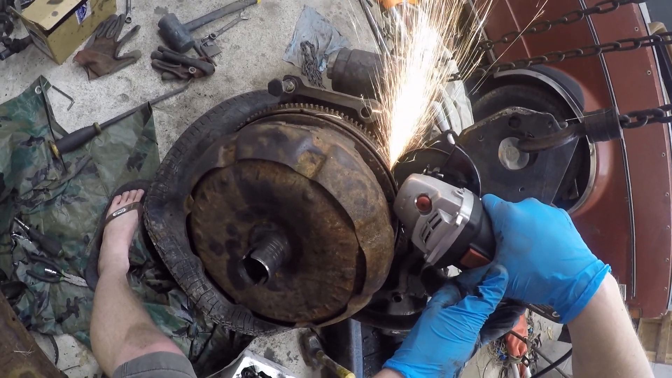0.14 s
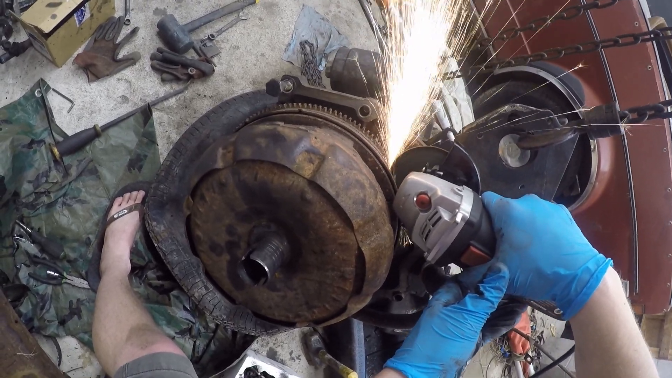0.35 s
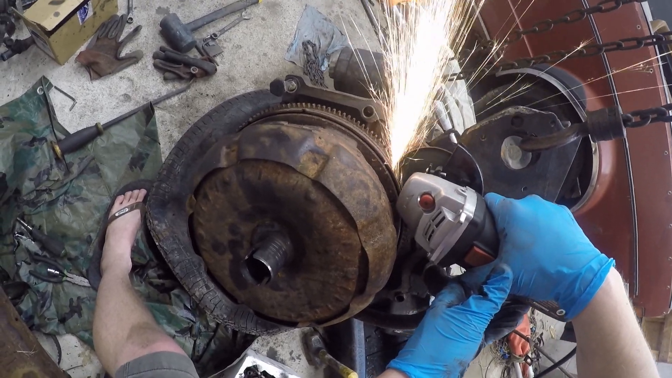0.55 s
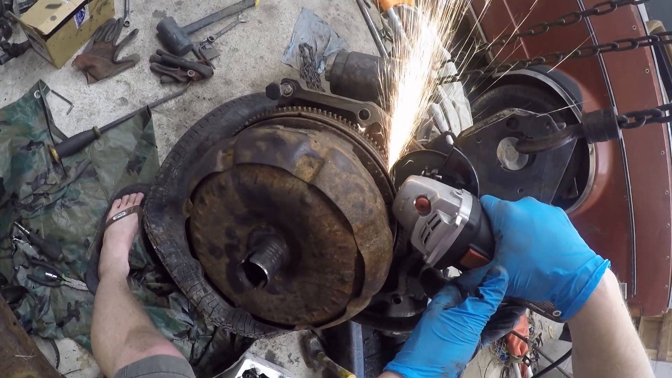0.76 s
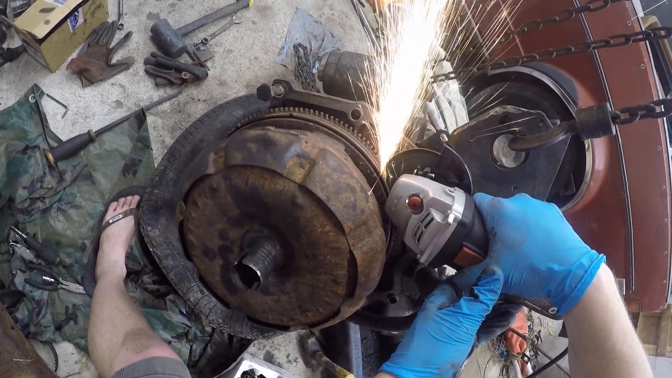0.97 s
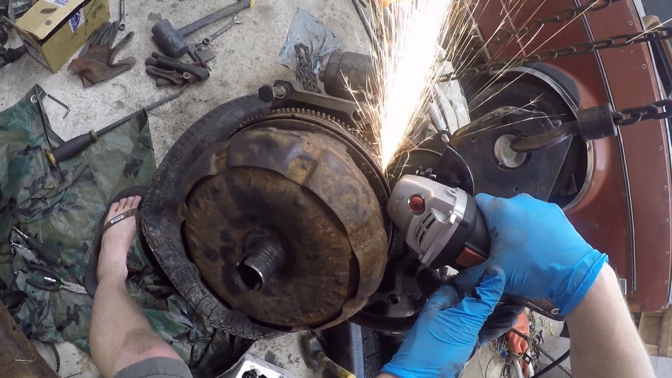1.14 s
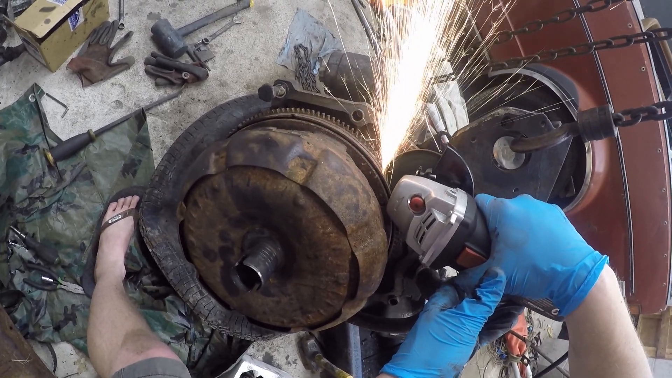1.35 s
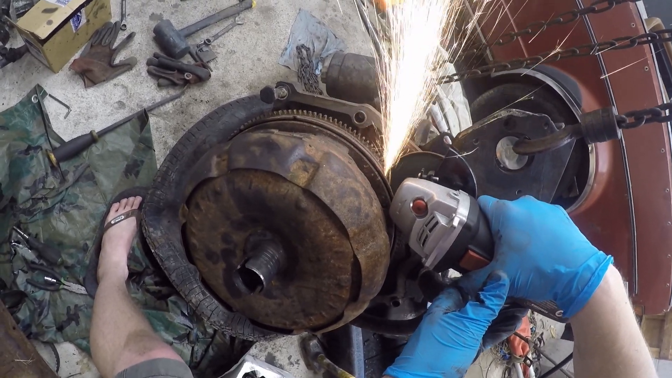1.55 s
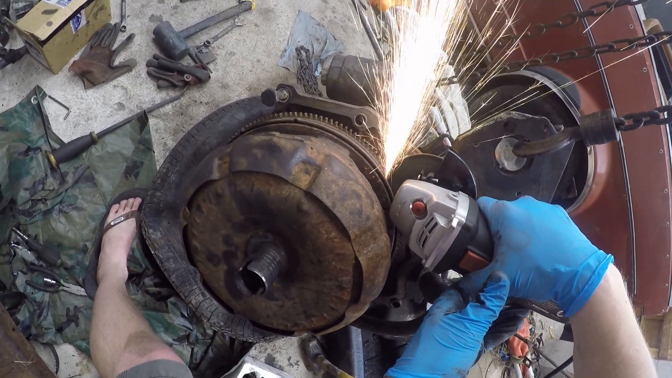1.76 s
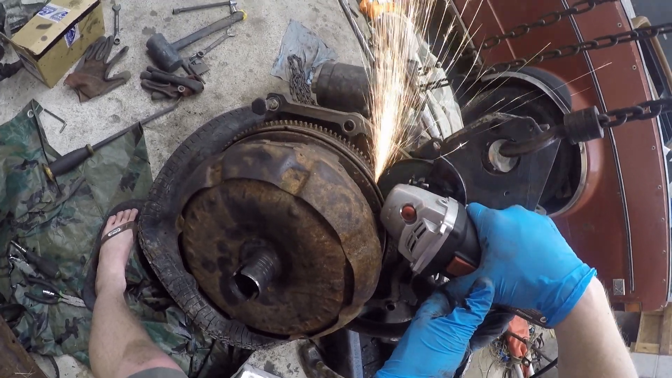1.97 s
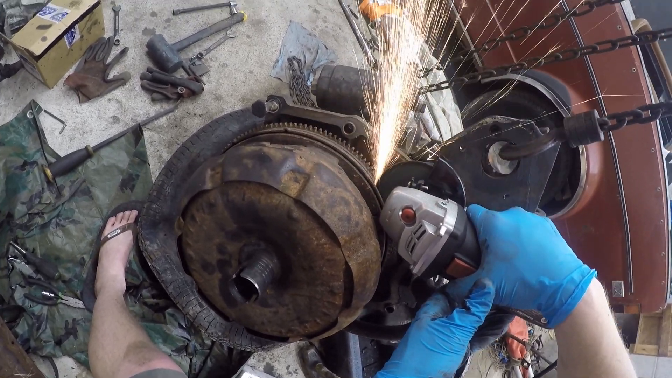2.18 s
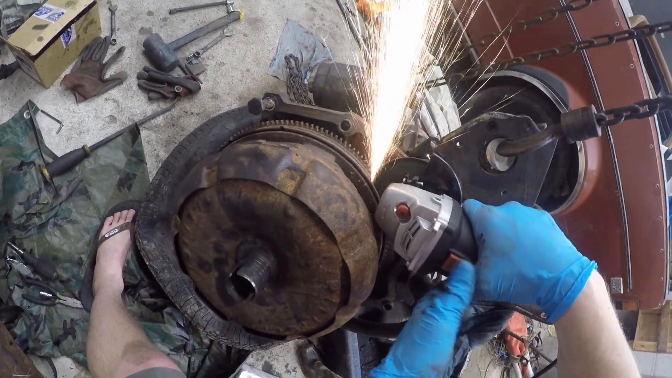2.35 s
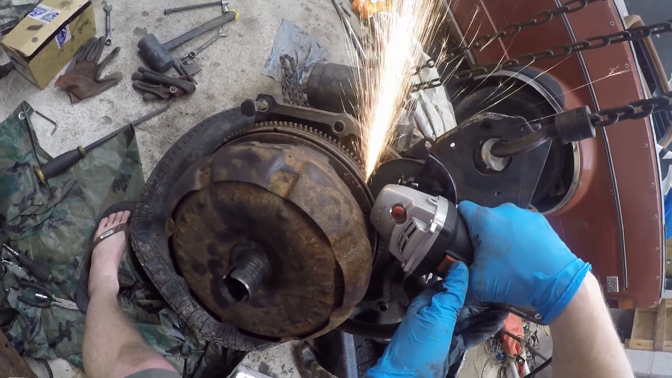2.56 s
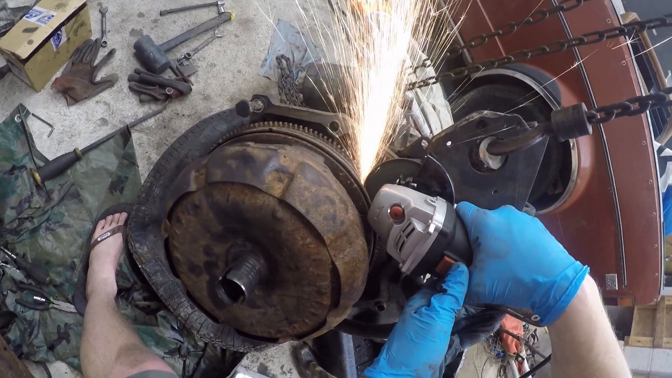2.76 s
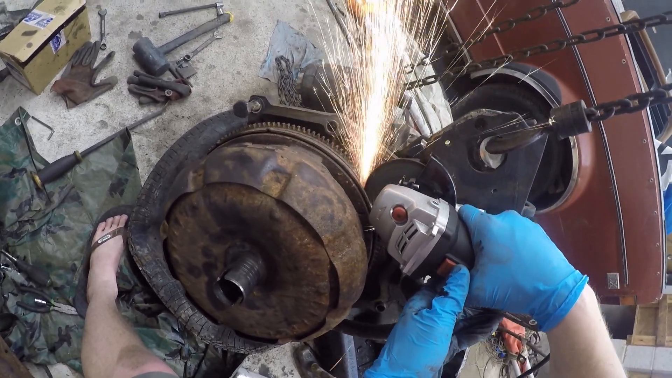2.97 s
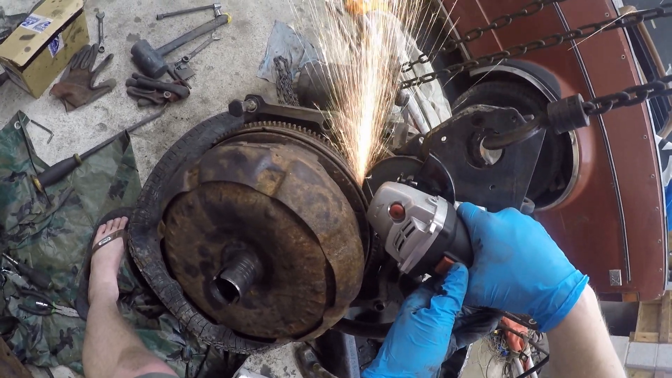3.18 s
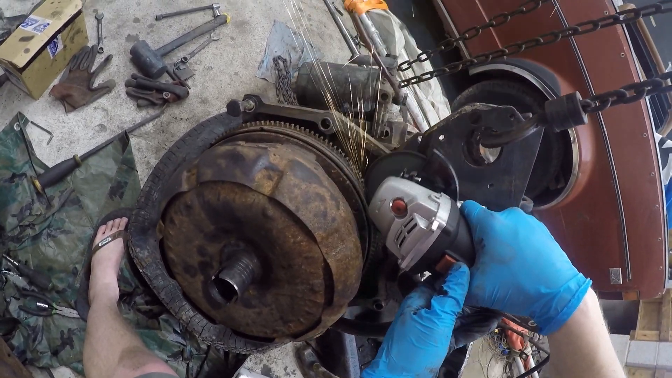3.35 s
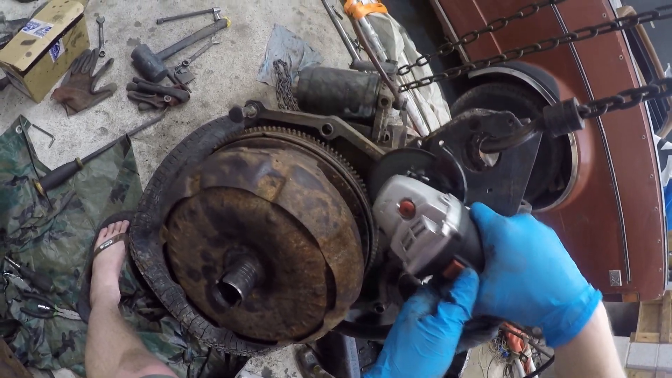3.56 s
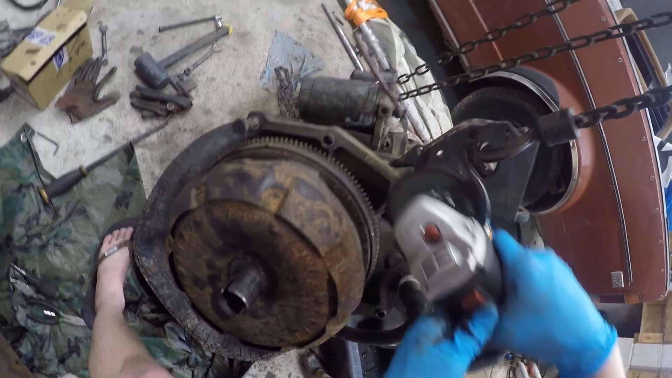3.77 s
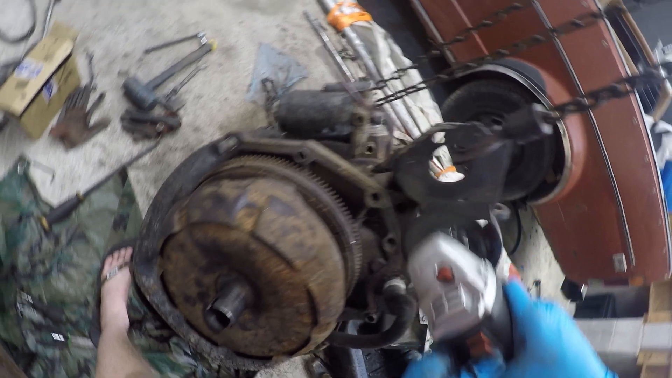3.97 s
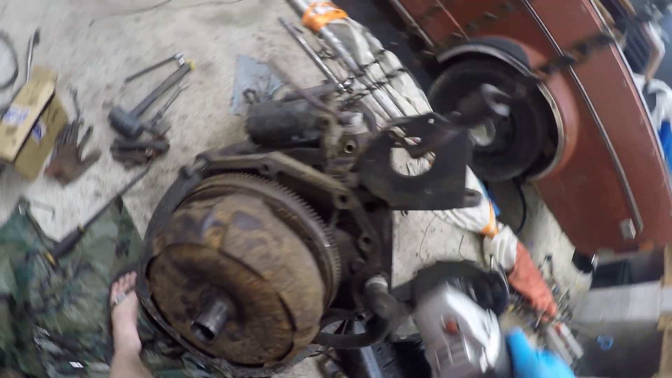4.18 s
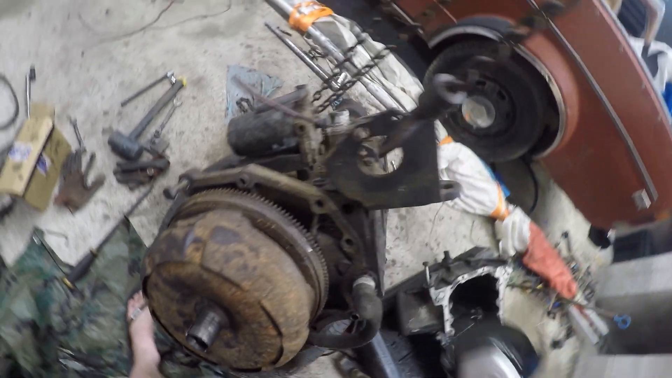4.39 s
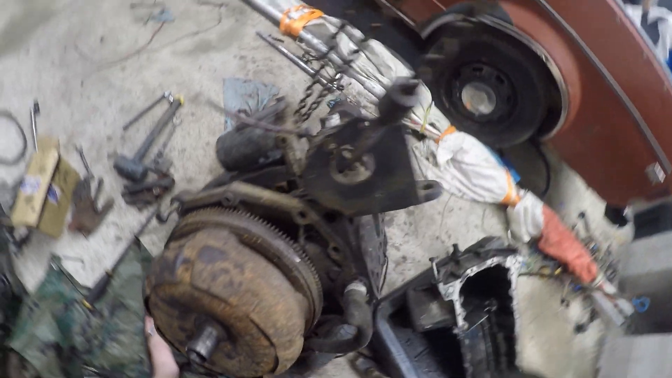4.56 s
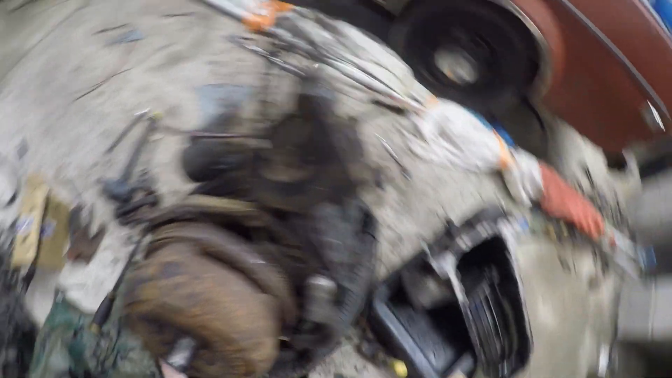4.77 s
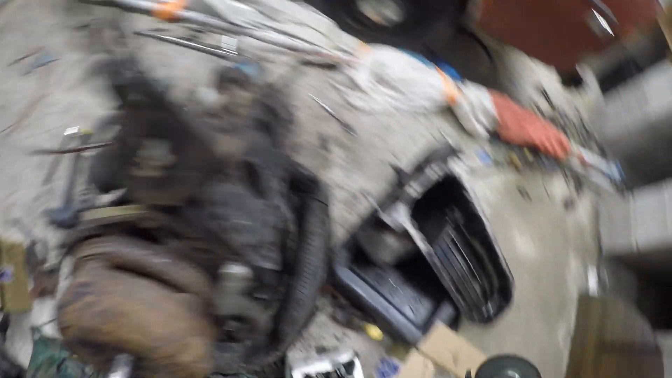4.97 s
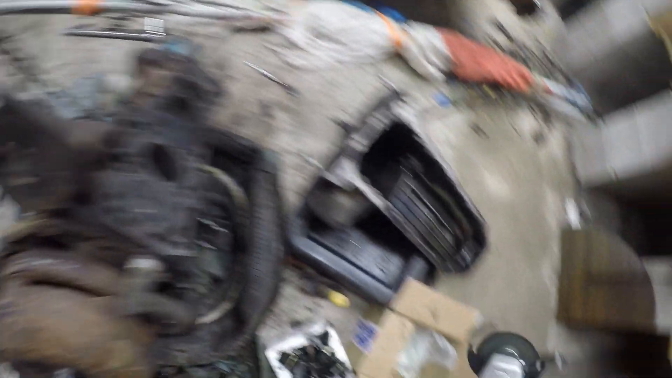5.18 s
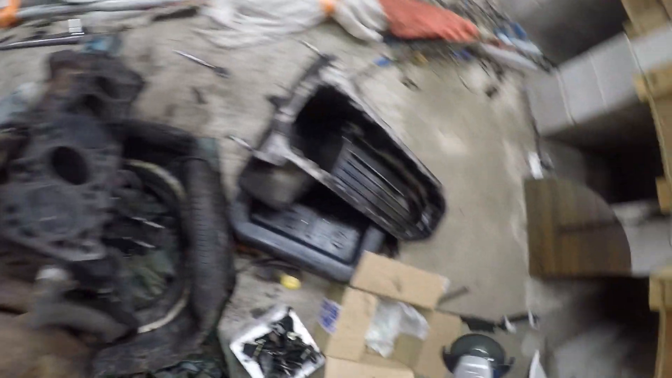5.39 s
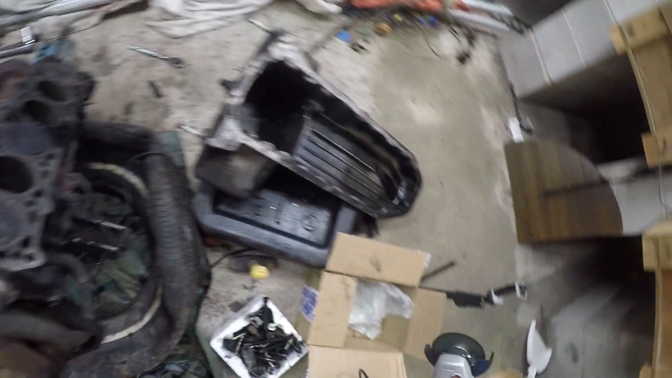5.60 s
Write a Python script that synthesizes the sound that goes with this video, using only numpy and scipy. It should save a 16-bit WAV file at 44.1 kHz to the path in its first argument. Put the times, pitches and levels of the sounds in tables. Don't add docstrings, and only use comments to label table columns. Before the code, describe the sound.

Close, gritty grinding of steel with chattering metallic tones, then the freed grinder motor rattles and coasts gradually lower and quieter.

```python
import sys
import numpy as np
from scipy import signal
from scipy.fft import rfft, irfft, next_fast_len
from scipy.io import wavfile
from scipy.ndimage import uniform_filter1d, map_coordinates

SR = 44100
rng = np.random.default_rng(int(sys.argv[2]) if len(sys.argv) > 2 else 0)


def makeup_ratio(level_db):
    decades = np.asarray(level_db, float) / 20
    return 10 ** decades


def inscribe(sig):
    pcm = np.round(np.clip(np.atleast_2d(sig).T, -1, 1) * 32767)
    wavfile.write(sys.argv[1], SR, pcm.astype(np.int16))


N = 248283
T = np.arange(N) / SR
F = np.maximum(np.fft.rfftfreq(next_fast_len(N + 8192), 1 / SR), 1)

# time in seconds, speed in turns per second.
LOADED_SPEED = [(0, 128), (1.98, 128.7), (2.14, 132.5), (2.31, 136.6), (2.39, 134.2), (2.54, 132.5),
                (2.7, 130.2), (2.86, 129), (2.94, 129.7), (3.1, 134.2), (3.3, 138.7)]
NO_LOAD_TURNS_S, RUN_UP_S, SWITCH_OFF_S, COAST_S = 166, .33, 4.02, 2.207
GEAR_RATIO, FAN_BLADES = 37 / 12, 37

# time in seconds, scrape level in dB.
BITE = [(0, -33), (.26, -35), (.6, -35), (.78, -37), (1.04, -33.5), (1.17, -35), (1.3, -32), (1.45, -34),
        (1.65, -34), (1.82, -33), (1.95, -34.5)]
# frequency in Hz, width in Hz, level in dB.
STEEL_SHALLOW = [(313, 73, -33.5), (601, 71, -25), (900, 66, -8.5), (1162, 43, -7.5), (2050, 480, -8),
                 (2462, 47, -1.5), (2920, 330, -0.5), (3150, 82, -0.5), (3450, 250, 0.5), (3800, 266, 2.5),
                 (4040, 140, -9), (4540, 190, -9.5), (5123, 640, -6), (6090, 180, -10), (7830, 680, -14),
                 (10260, 1600, -15.5), (12020, 630, -16)]
# frequency in Hz, level in dB.
STEEL_BED = [(150, -55), (500, -55), (900, -18), (1500, -26.5), (2600, -10.5), (4250, -19.5), (5600, -12.5),
             (8800, -26.5), (15000, -21.5)]
# time in seconds, lift in dB.
SNAGS = [(.074, -4), (.215, 6), (.4, 5), (.84, 4), (1.5, 3), (1.887, -8), (1.97, 3), (2.068, 6), (2.132, 4),
         (2.318, 4), (2.355, 2), (2.377, 5), (2.414, 5), (2.51, 6), (2.57, 3), (2.643, 3), (2.707, 1),
         (2.748, -1), (2.859, 1), (2.914, 1), (3.032, 1), (3.261, 1)]
# centre in seconds, from Hz, to Hz, level in dB,
# half length in seconds.
CHATTER_BURSTS = [(.08, 2853, 3000, -31, .05), (.2, 3850, 4120, -40, 0.056), (.31, 3800, 3750, -32, 0.07),
                  (.45, 3400, 3320, -37.5, .045), (.53, 3170, 3150, -36, 0.036),
                  (.63, 2960, 3090, -35.5, 0.068), (.73, 3400, 3490, -41, 0.044), (.8, 3730, 3800, -33, 0.032),
                  (.86, 3340, 3260, -34.5, 0.019), (.9, 2890, 3000, -39.5, 0.044),
                  (.98, 3330, 3360, -37, 0.045), (1.05, 2976, 2900, -34.5, 0.055),
                  (1.13, 2680, 2550, -45, 0.077), (1.265, 2850, 2974, -32.5, 0.03),
                  (1.27, 2110, 2100, -47, 0.077), (1.33, 1655, 1680, -50, 0.087),
                  (1.33, 3400, 3450, -42, 0.047), (1.55, 3500, 3240, -37, 0.039),
                  (1.55, 3840, 3774, -37.5, 0.093), (1.62, 2920, 2933, -36.5, 0.064),
                  (1.72, 3124, 2960, -36, 0.043), (1.81, 2933, 2900, -32, 0.082),
                  (1.86, 2050, 2050, -43, 0.15), (1.93, 2800, 2883, -32, 0.046),
                  (.045, 3710, 3800, -34, .015), (.15, 3760, 3750, -35, .02), (.24, 5220, 5230, -40, .03),
                (.42, 5300, 5290, -46, .03), (.58, 3800, 3750, -39, .03), (.89, 3800, 3790, -40, .015),
                (1.03, 3800, 3810, -40, .035), (1.12, 5000, 4990, -44, .03), (1.28, 3780, 3770, -38, .04),
                (1.41, 3760, 3800, -38, .04), (1.645, 3800, 3680, -31.5, .015),
                (1.86, 3730, 3720, -38, .025), (2.17, 5040, 5040, -44, .035),
                (2.28, 3770, 3710, -33.5, .04), (2.36, 2860, 2836, -38, .035), (2.49, 3740, 3810, -33, .04),
                (2.62, 3760, 3700, -34.5, .04), (2.99, 2900, 2900, -39, .02), (3.01, 3690, 3700, -33, .035),
                (3.17, 3760, 3770, -36, .03), (3.245, 3720, 3700, -37, .02), (3.3, 4850, 4850, -33, .025),
                (3.49, 4565, 4565, -49, .035), (3.58, 2840, 2820, -45, .035), (3.63, 960, 960, -59, .03),
                (3.8, 3490, 3470, -48, .03), (3.9, 1056, 1070, -53, .07), (3.93, 3830, 3830, -41, .03),
                (4.03, 3100, 3060, -54, .03), (4.12, 1160, 1160, -58, .05), (4.3, 1222, 1260, -57, .06),
                (4.36, 4600, 4870, -52, .05), (4.52, 1166, 1162, -59, .06), (4.64, 3310, 3300, -62, .03),
                (4.86, 2070, 2070, -59, .03)]

# frequency in Hz, width in Hz, level in dB.
CASING_FACING = [(1120, 365, -4), (1920, 530, -6), (2900, 240, -4), (3450, 360, -5.5), (3750, 340, -2.5),
                 (4530, 97, -5), (4960, 600, -7), (5950, 370, -6), (6660, 710, -17.5), (8080, 450, -12),
                 (10300, 880, -15), (11440, 900, -13.5), (13300, 1200, -19)]
# frequency in Hz, width in Hz, level in dB.
CASING_AWAY = [(1180, 290, -9.5), (1870, 370, -7), (2890, 260, -10), (3710, 750, -7.5), (4330, 300, -4),
               (4990, 680, -1.5), (5850, 560, -1), (7100, 400, -10.5), (8070, 690, -11.5),
               (10930, 1400, -8), (13200, 1800, -20)]
# frequency in Hz, level in dB.
CASING_BED = [(150, -45), (500, -30), (900, -13), (1500, -17), (2500, -8.5), (4300, -13.5), (6500, -17.5),
              (8800, -19), (15000, -23)]
# time in seconds, mid rattle in dB, vents towards the microphone in dB.
SWING = [
    (3.35, 2, 0.5),
    (3.45, 3.5, -2.5),
    (3.62, 2.5, -1.5),
    (3.74, -.4, -1),
    (4.0, 0.5, 1),
    (4.15, 0.6, 2),
    (4.42, -3, 0.1),
    (4.6, 0, 1),
    (5.1, -0.3, -0.8),
    (5.6, 1, 0.5),
]
RATTLE_POWER = 3.04
# frequency in Hz, hum level in dB.
HUM = [(240, -84), (258, -77), (280, -82), (300, -77), (340, -67), (380, -71), (428, -77), (495, -74.5)]
# frequency in Hz, whine level in dB.
WHINE = [(8900, -79), (9200, -72), (9500, -90), (9850, -90), (10200, -72), (11070, -68), (12500, -74),
         (15000, -81)]
# centre in seconds, half length in seconds, multiple of shaft turn, level in dB.
OVERTONES = [
    (3.52, .16, 2, -55),
    (4.43, .13, 2, -61),
    (4.74, .2, 3, -62),
    (5.33, .08, 3, -66),
]
# time in seconds, treble lift in dB.
GUARD_TICKS = [(3.81, 2), (4.053, 2.6), (4.09, 3), (4.212, 4.5), (4.46, 4), (4.5, 3.7), (4.53, 4),
               (4.56, 5), (4.685, 3), (4.753, 4), (4.78, 6), (4.885, 6.5), (4.96, 4), (4.982, 4.6),
               (5.062, 5.4), (5.12, 3), (5.163, 6), (5.24, 3), (5.5, 4), (5.59, 5)]

# centre in seconds, level in dB, half length in seconds.
GUSTS = [(0, -39.5, 0.11), (0.348, -48.5, 0.087), (0.523, -52, .05), (.7, -62, 0.072), (.9, -58, 0.11),
         (1.09, -52, 0.038), (1.174, -58, .04), (1.256, -58, .07), (1.427, -60, 0.04),
         (1.627, -46.5, 0.053), (1.772, -57, 0.041), (1.878, -56, .06), (2.22, -59, 0.087),
         (2.52, -57, 0.14), (2.988, -57, .06), (3.15, -63, .08), (3.477, -55, .08), (3.72, -68, 0.054),
         (3.924, -60, 0.046), (4.067, -50, 0.032), (4.16, -55, 0.072), (4.443, -60, .07),
         (4.627, -60, 0.092), (4.963, -54, 0.094), (5.28, -55, 0.091), (5.55, -61, 0.22)]
# frequency in Hz, level in dB per Hz.
WIND_COLOUR = [(8.8, -34), (15, 10), (32, 7), (52, 3), (63, -1), (119, -23.5), (168, -39), (220, -39.5),
               (290, -69), (480, -120)]
# frequency in Hz, level in dB.
GARAGE_COLOUR = [(100, 4.5), (200, -2), (400, -3.5), (800, 2.5), (1600, -22), (4000, -34)]
# centre in seconds, half length in seconds, multiple, level in dB.
SINGS = [(.8, .06, 14, -54), (1.85, .07, 9, -52), (2.47, .14, 45, -48), (2.56, .06, 16, -47),
         (2.25, .07, 15, -46), (2.3, .06, 38, -45), (2.6, .08, 17, -46), (2.69, .08, 41, -43),
         (2.78, .11, 18, -43), (2.78, .08, 19, -47), (2.8, .05, 39, -44), (2.87, .07, 41, -45),
         (2.95, .07, 35, -44), (3.05, .04, 39, -43), (3.18, .09, 38, -43), (3.2, .11, 37, -40),
         (2.55, .06, 28, -41), (3.27, .045, 36, -44)]

# time in seconds, pressure in dB.
PRESSURE = [(2.06, -3), (2.2, -1.5), (2.32, -0.4), (2.42, 0), (2.54, 0), (2.66, -0.1), (2.9, -0.4),
            (3.02, 0.9), (3.14, 1.3), (3.3, 1.3)]
# frequency in Hz, width in Hz, level in dB.
STEEL_SLOT = [(937, 245, -14), (1156, 130, -9), (2050, 400, -1.5), (2900, 250, -4), (3750, 410, 0.5),
              (4597, 220, -1.5), (5014, 240, 3), (5280, 210, 1.5), (6020, 150, -2.5), (6720, 320, -12.5),
              (7790, 610, -7.5), (9530, 540, -16.5), (10280, 580, -16), (11800, 840, -20.5)]
# frequency in Hz, level in dB.
SLOT_BED = [(150, -49), (500, -36), (900, -12.5), (1500, -20.5), (2600, -7.5), (4250, -15), (5600, -9),
            (8800, -28.5), (13500, -23), (15300, -29.5)]
SQUEAL_ORDERS = [7, 14, 15, 16, 17, 18]
SQUEAL_DB = [-60, -53, -50, -55.5, -55, -61]
SQUEAL_LOCK_DB = [0.5, 1.5, -23, 15, 0, 2]
# frequency in Hz, width in Hz, lift in dB.
BOLT_MODES = [(2050, 210, 8), (2355, 60, 9), (950, 78, 7.5)]
# centre in seconds, level in dB, half length in seconds.
GRAZES = [
    (3.385, -38, 0.016),
    (4.078, -45, 0.02),
    (4.779, -48, .005),
    (4.885, -52, .008),
    (4.98, -55, .012),
    (5.494, -53.5, 0.017),
]
# time in seconds, smallest partial kept over the local mean,
# frequency in Hz above which almost nothing is kept.
THINNED = [(3.63, 1.4, 8500), (4.59, 1.75, 7500), (5.122, 1.7, 7500), (5.337, 1.1, 8000), (5.38, 1.1, 8000)]


def unit(x):
    return x / np.sqrt(np.mean(x ** 2))


def curves(table):
    s, *columns = np.transpose(table)
    return [np.interp(T, s, column) for column in columns]


def colour(points):
    hz, db = np.transpose(points)
    return makeup_ratio(np.interp(np.log(F), np.log(hz), db))


def shape(x, gain):
    return unit(irfft(rfft(x, 2 * len(F) - 2) * gain)[:N])


def walk(rate):
    k = int(SR / rate)
    held = np.repeat(rng.standard_normal(N // k + 1), k)
    return unit(uniform_filter1d(uniform_filter1d(held, k), k)[:N])


def waver(slow_db, slow_rate, quick_db, quick_rate):
    return slow_db * walk(slow_rate) + quick_db * walk(quick_rate)


def swell(s, half, power):
    return np.exp(-np.abs((T - s) / half) ** power)


def grains(spread_db):
    size_db = spread_db * uniform_filter1d(rng.standard_normal(N), 24) * 6.2
    return unit(rng.standard_normal(N) * makeup_ratio(size_db))


def resonance(modes, bed):
    power = colour(bed) ** 2
    for hz, width, db in modes:
        power = power + makeup_ratio(db) ** 2 / (1 + (2 * (F - hz) / width) ** 2) ** 1.95
    return np.sqrt(power)


def ring(force, flutter_db, modes, bed, mid_db, low_db, high_db, hiss_db):
    rung = rfft(force, 2 * len(F) - 2) * resonance(modes, bed)
    above = [1 / (1 + (hz / F) ** 16) for hz in (2600, 4300, 8700)]
    shares = (1 - above[0], above[0] - above[1], above[1] - above[2], above[2])
    gains_db = (low_db + 0.2 * flutter_db, 0.19 * flutter_db,
                high_db + 0.5 * flutter_db, hiss_db + 0.77 * flutter_db)
    bands = (makeup_ratio(db) * unit(irfft(rung * share)[:N]) for db, share in zip(gains_db, shares))
    return makeup_ratio(mid_db) * sum(bands)


def spin():
    lift_s, lift_turns = LOADED_SPEED[-1]
    free_s = np.clip(T, lift_s, SWITCH_OFF_S) - lift_s
    run_up = NO_LOAD_TURNS_S - (NO_LOAD_TURNS_S - lift_turns) * np.exp(-free_s / RUN_UP_S)
    coasting = run_up * np.exp(-np.maximum(T - SWITCH_OFF_S, 0) / COAST_S)
    return np.where(T < lift_s, curves(LOADED_SPEED)[0], coasting)


def slot_depth():
    return np.interp(T, [1.97, 2.05], [0, 1])


def snags():
    rise_s, fall_s = 0.0021, 0.017
    return sum(db * np.exp(-np.where(T < s, (s - T) / rise_s, (T - s) / fall_s)) for s, db in SNAGS)


def shallow_cut():
    bite = curves(BITE)[0]
    mean_db = -34
    bands = zip((-42.5, -37.5, -49.5), (0.81, -0.2, .05))
    over_db = [db + follow * (bite - mean_db) - bite for db, follow in bands]
    flutter_db = waver(0.87, 17.95, 0.88, 90) + snags()
    scrape = ring(grains(1.13), flutter_db, STEEL_SHALLOW, STEEL_BED, bite, *over_db)
    return np.sqrt(1 - slot_depth()) * scrape


def chatter():
    out = np.zeros(N)
    sway = walk(230) + 1j * walk(230)
    for k, (s, from_hz, to_hz, db, half) in enumerate(CHATTER_BURSTS):
        at = slice(max(int((s - 2 * half) * SR), 0), int((s + 2 * half) * SR))
        u = (T[at] - s) / half
        hz = (from_hz + to_hz) / 2 + (to_hz - from_hz) / 2 * u
        rough = 1.1 + .45 * np.roll(sway, 9000 * k)[at]
        tone = np.real(rough * np.exp(2j * np.pi * np.cumsum(hz) / SR))
        out[at] += makeup_ratio(db) * np.exp(-u ** 4) * tone
    return out


def coast_level():
    return -20 * np.log10(np.e) * np.maximum(T - SWITCH_OFF_S, 0) / COAST_S


def guard_lift():
    return sum(db * swell(s, 0.0054, 2) for s, db in GUARD_TICKS)


def gear_rattle():
    teeth, flutter_db = grains(1.27), waver(0.7, 18, 1.0, 100)
    away = np.interp(T, [4.25, 4.6], [0, 1])
    coast_db, ticks_db = coast_level(), guard_lift()
    swing_db, vents_db = curves(SWING)
    mid_db = RATTLE_POWER * coast_db + swing_db
    bands = zip((-6, -2, -11), (2.52, 2.78, 3.17))
    over_db = [db + power * coast_db - mid_db for db, power in bands]
    over_db[1] = over_db[1] + vents_db + 0.28 * ticks_db
    over_db[2] = over_db[2] + 0.31 * vents_db + ticks_db
    facing, turned = (ring(teeth, flutter_db, modes, CASING_BED, -40 + mid_db, *over_db)
                      for modes in (CASING_FACING, CASING_AWAY))
    loaded = np.interp(T, [3.3, 3.33], [.4, 1])
    return loaded * ((1 - away) * facing + away * turned)


def armature_hum(turns, speed):
    shaft = 2 * np.pi * GEAR_RATIO * turns
    grip_s = [2, 2.1, 3, 3.3, 3.6, 3.75, 4.05, 4.2, 5.05, 5.2]
    grip_db = [-20, 2.5, 2.5, -1, -1, 2, 2, 1.5, 0, 0]
    db = np.interp(GEAR_RATIO * speed, *np.transpose(HUM)) + np.interp(T, grip_s, grip_db)
    hum = np.sqrt(2) * makeup_ratio(db + 1.3 * walk(14)) * np.sin(shaft + .3 * walk(14))
    overtones = sum(makeup_ratio(db) * swell(s, half, 4) * np.sin(round(k) * shaft) for s, half, k, db in OVERTONES)
    return hum + overtones


def wind():
    lull_db = -63.5
    gusts = makeup_ratio(lull_db) + sum(makeup_ratio(db) * swell(s, half, 2) for s, db, half in GUSTS)
    return gusts * shape(rng.standard_normal(N), colour(WIND_COLOUR))


def garage():
    return makeup_ratio(-72.5) * shape(rng.standard_normal(N), colour(GARAGE_COLOUR))


def singing(turns):
    rough = makeup_ratio(5.3 * walk(40.44)) * np.exp(.4j * walk(60))
    out = np.zeros(N)
    for k, (s, half, order, db) in enumerate(SINGS):
        tone = np.roll(rough, 7000 * k) * np.exp(2j * np.pi * round(order) * turns)
        out += np.sqrt(2) * makeup_ratio(db) * swell(s, half, 4) * np.imag(tone)
    return out


def disc_face(turns):
    wear_turns = 14
    shapes = int(turns[-1] / 8) + 3
    orders = np.zeros((shapes + 1, 2049), complex)
    orders[:, 1:121] = np.exp(2j * np.pi * rng.random((shapes + 1, 120)))
    orders[:, SQUEAL_ORDERS] *= .3
    faces = irfft(orders, 4096)
    faces = 1.2 * faces[0] + faces[1:]
    place = [turns / wear_turns, turns % 1 * 4096]
    face = unit(map_coordinates(faces, place, order=1, mode="grid-wrap"))
    steady = 1 / (1 + (F / 7000) ** 4) / (1 + (1100 / F) ** 8)
    steady = steady * (1 - .55 / (1 + ((F - 3400) / 800) ** 4))
    return unit(shape(face, np.sqrt(steady)) + 1.03 * shape(grains(2.3), np.sqrt(1 - steady)))


def squeal(turns, speed, lock):
    out = np.zeros(N)
    for order, db, lock_db in zip(SQUEAL_ORDERS, SQUEAL_DB, SQUEAL_LOCK_DB):
        hz = order * speed
        near_db = sum(lift / (1 + (2 * (hz - mode_hz) / width) ** 2) for mode_hz, width, lift in BOLT_MODES)
        level_db = db + lock_db * lock + near_db + .7 * walk(25)
        out += np.sqrt(2) * makeup_ratio(level_db) * np.sin(2 * np.pi * order * turns + .2 * walk(30))
    return out


def slot_cut(turns, speed):
    pressure = curves(PRESSURE)[0]
    lock = np.interp(T, [2.62, 2.77, 2.96, 2.985], [0, 1, 1, 0])
    bands = zip((-33, -40, -33.5, -45), (0.32, 0.33, 1.3, 1.3))
    scrape_db, *others = (db + follow * pressure for db, follow in bands)
    scrape_db = scrape_db - 0.5 * lock
    repeat = 0.39 + 0.16 * lock
    force = np.sqrt(1 - repeat) * grains(3.1) + np.sqrt(repeat) * disc_face(turns)
    flutter_db = waver(0.75, 16, 0.65, 90) + snags()
    over_db = [db - scrape_db for db in others]
    slot = ring(force, flutter_db, STEEL_SLOT, SLOT_BED, scrape_db, *over_db)
    contact = np.interp(T, [3.315, 3.33], [1, 0])
    return np.sqrt(slot_depth()) * contact * (slot + squeal(turns, speed, lock))


def grazes():
    push = sum(makeup_ratio(db) * swell(s, half, 2) for s, db, half in GRAZES)
    return push * ring(grains(2.5), waver(.5, 20, 1.5, 150), STEEL_SLOT, SLOT_BED, 0, -7.0, 1.2, -13.0)


def guard_ring():
    guard = shape(grains(2.5), 1 / (1 + ((F - 7300) / 1100) ** 6))
    return makeup_ratio(-60 + RATTLE_POWER * coast_level()) * guard_lift() * guard


def disc_wobble(turns):
    return swell(4.45, .17, 2) * makeup_ratio(-65) * np.sin(10 * np.pi * turns)


def fan_whine(turns, speed):
    blade_rate = FAN_BLADES * GEAR_RATIO
    db = np.interp(blade_rate * speed, *np.transpose(WHINE))
    whine = np.sin(2 * np.pi * blade_rate * turns + .8 * walk(150)) * (T > 4.4)
    return np.sqrt(2) * makeup_ratio(db + 1.7 * walk(30)) * whine


def scene():
    speed = spin()
    turns = np.cumsum(speed) / SR
    cut = shallow_cut() + slot_cut(turns, speed) + chatter() + singing(turns) + grazes()
    motor = gear_rattle() + guard_ring() + armature_hum(turns, speed) + fan_whine(turns, speed)
    mono = cut + motor + disc_wobble(turns) + wind() + garage()
    return np.array([mono, mono])


def roll_off(x):
    return signal.sosfilt(signal.butter(12, 15520, fs=SR, output="sos"), x)


def record(dry):
    out, size = dry.copy(), 1700
    window = np.sin(np.pi * np.arange(size) / size)
    hz = np.fft.rfftfreq(size, 1 / SR)
    for s, keep, top_hz in THINNED:
        at = slice(int(s * SR) - size // 2, int(s * SR) + size // 2)
        partials = rfft(out[:, at] * window)
        threshold = np.where(hz > top_hz, 1.75, keep)
        weak = abs(partials) < threshold * uniform_filter1d(abs(partials), 80, axis=1)
        out[:, at] -= irfft(partials * np.where(weak, .9, -.3), size) * window
    low_pass = signal.ellip(10, .2, 60, 15330, fs=SR, output="sos")
    out = signal.sosfiltfilt(low_pass, out)
    return roll_off(out)


dry = scene()
out = record(dry)
inscribe(out)
```